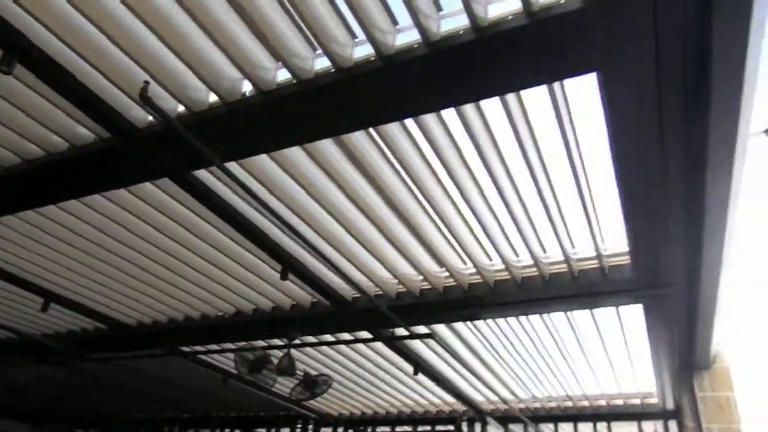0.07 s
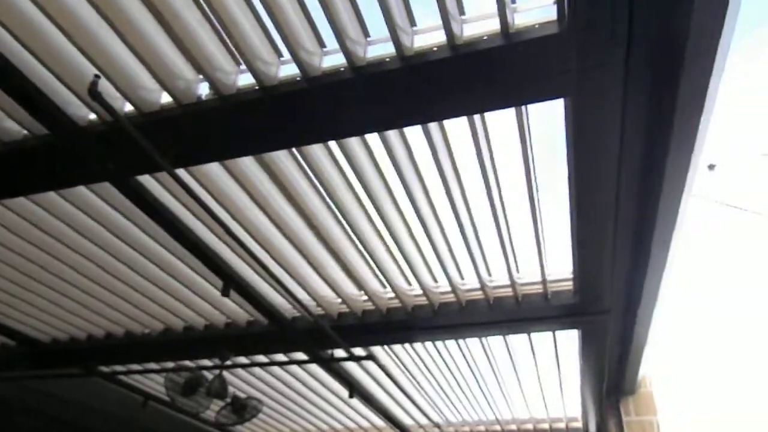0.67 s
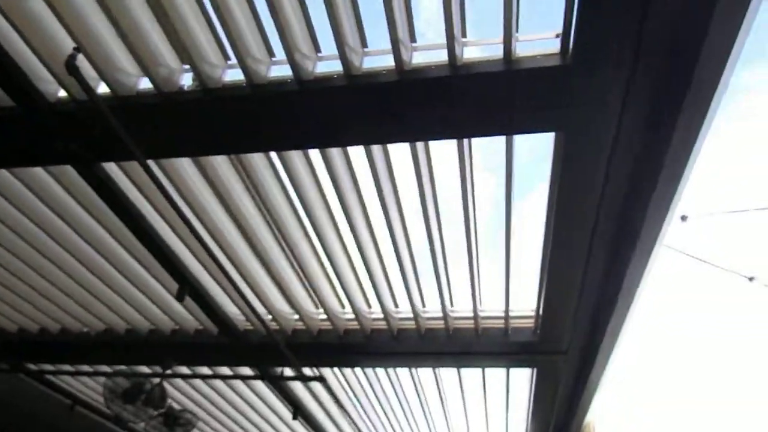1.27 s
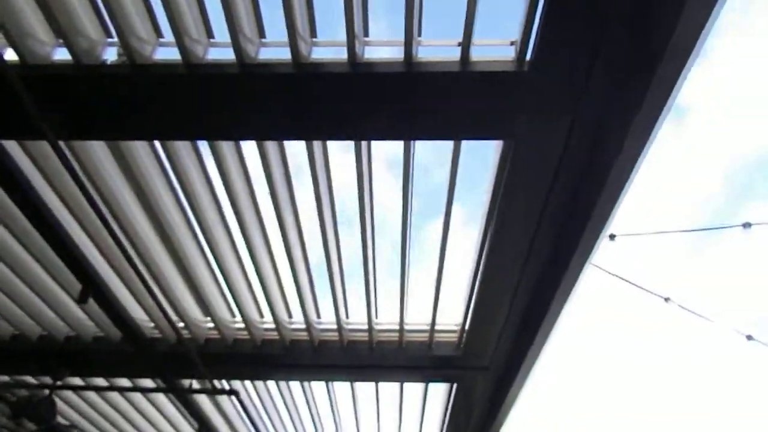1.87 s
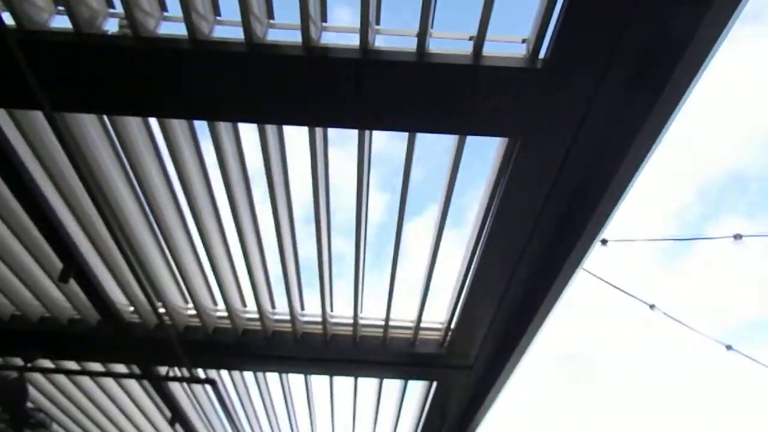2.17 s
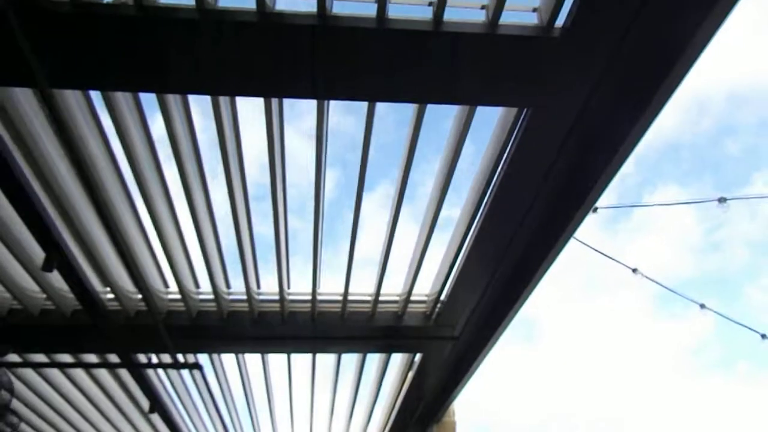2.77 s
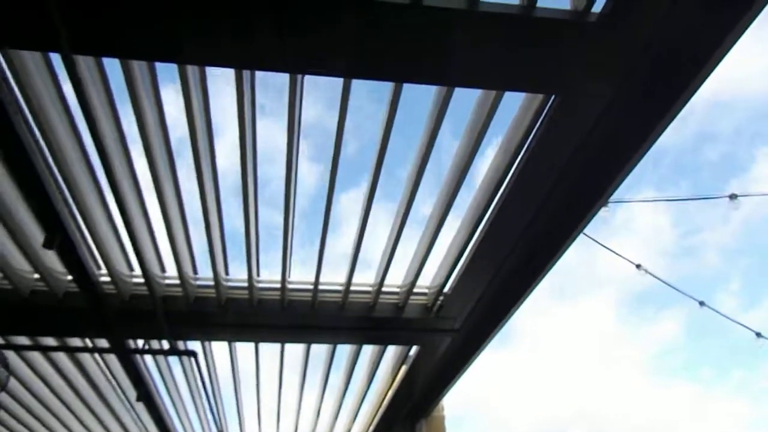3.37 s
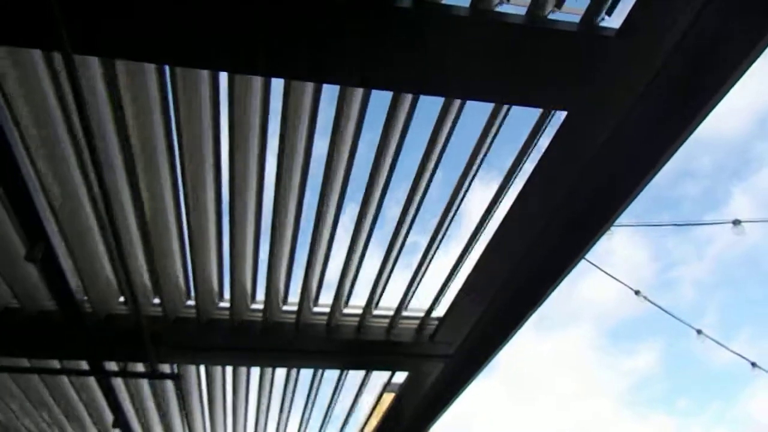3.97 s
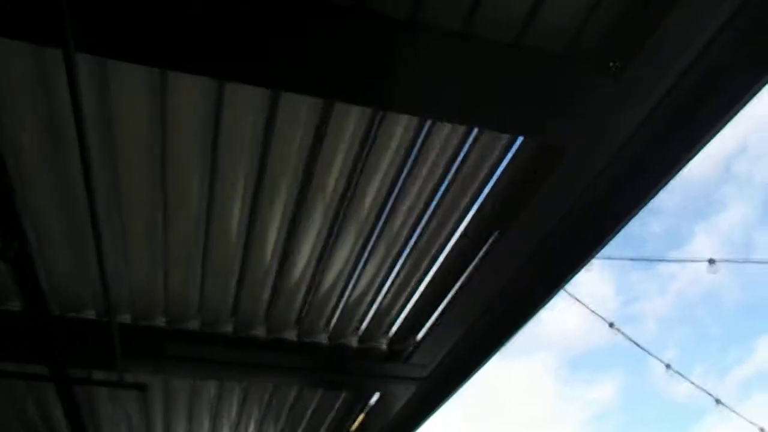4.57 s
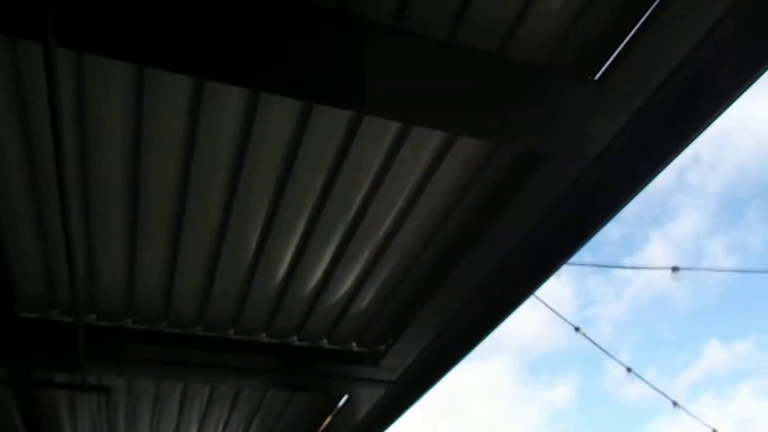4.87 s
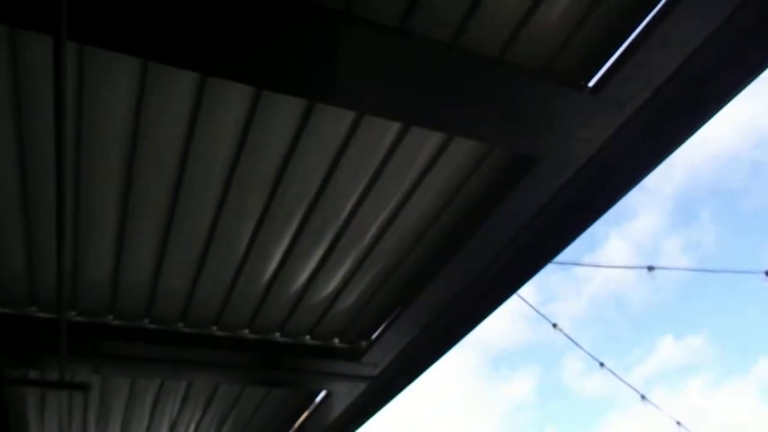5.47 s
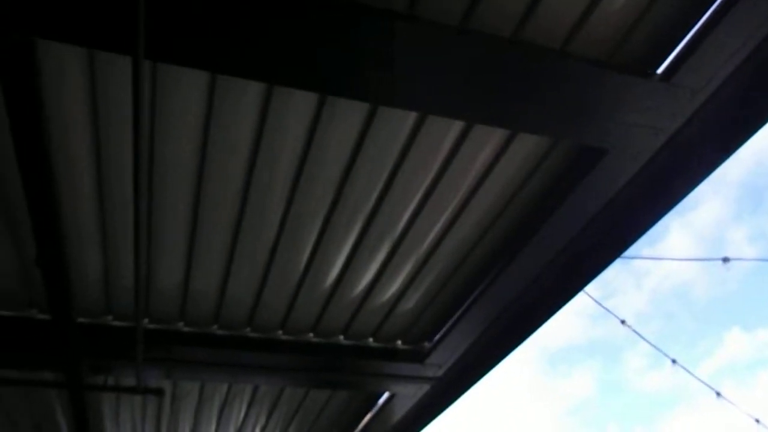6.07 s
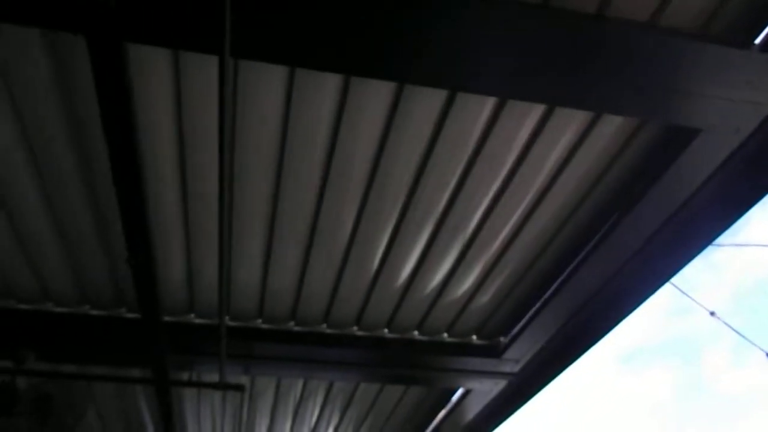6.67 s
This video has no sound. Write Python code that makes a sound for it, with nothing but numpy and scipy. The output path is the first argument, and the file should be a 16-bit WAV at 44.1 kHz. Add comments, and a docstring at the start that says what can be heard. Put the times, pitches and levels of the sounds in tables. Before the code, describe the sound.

Under a patio roof, metal louvers close in several loud, clattering volleys that ring briefly, mixed with high squeaks from dry pivots and sharp little clicks. Before this come a few close clicks and about three seconds of low, uneven wind puffs on the microphone. A faint hum and a wash of distant outdoor noise run throughout, with a soft swish after the slats settle.

```python
"""A motor shuts the hollow aluminium slats of a patio roof, over distant outdoor noise and a faint hum.
First a few small contacts click close by. For three seconds eddies of a light breeze buffet the
microphone, while one pivot chirps faintly with each turn of the drive. From 3.3 s to 5 s row after row
falls over: the impacts excite the modes of the slats and reverberate under the roof, amid squeaks of
dry pivots and more clicks. The ringing decays, and a soft swish passes in the outdoor noise."""
import sys
import numpy as np
from scipy import signal
from scipy.fft import rfft, irfft, next_fast_len
from scipy.io import wavfile
from scipy.ndimage import map_coordinates

SR = 44100
rng = np.random.default_rng(int(sys.argv[2]) if len(sys.argv) > 2 else 0)


def log_audio(samples):
    """Write samples as a 16-bit WAV file to the path given in sys.argv[1]."""
    # one column per channel
    frames = np.atleast_2d(samples).T
    # limit to full scale, then quantise
    limited = np.clip(frames, -1, 1)
    pcm = np.round(limited * 32767).astype(np.int16)
    wavfile.write(sys.argv[1], SR, pcm)


N = 296793

# Levels are relative within each table; t60 is the time of a 60 dB decay.
# spectrum of the distant noise: f/Hz, level/dB
AIR_SPECTRUM = [(25, -27), (70, -21.5), (130, -17.5), (220, -20), (340, -14), (450, -8.5), (800, -3),
                (1100, -2.5), (1350, -0.5), (1900, -9.5), (3500, -18.5), (5800, -16.5), (8000, -26),
                (10500, -37), (15800, -42.5)]
# its slow drift: t/s, level/dB
AIR_LEVEL = [(0, -44), (.8, -44.5), (2, -43.5), (3.2, -42.5), (5.3, -42), (6, -42), (6.7, -42)]
# soft swishes: t/s, half length/s, level/dB
SWISHES = [(2.015, 0.045, -42), (5.67, 0.12, -46.5)]
# their spectrum: f/Hz, level/dB
SWISH_SPECTRUM = [(1000, -50), (3000, 7.5), (6000, 11), (9000, -2), (15000, -30)]
# gusts at the microphone: t/s, length/s, level/dB
GUSTS = [(0.312, 0.12, -47), (1.163, 0.096, -43.5), (1.32, 0.17, -47), (1.54, 0.082, -40),
         (1.637, .045, -35.5), (1.845, .29, -38.5), (2.191, .13, -41), (2.411, .17, -46.5),
         (2.663, .035, -37), (2.76, 0.44, -55.5)]
# spectrum of slow eddies: f/Hz, level/dB
RUMBLE_SPECTRUM = [(20, -33), (45, -11), (90, -1.5), (200, -1), (350, -3), (600, -18), (1500, -71)]
# spectrum of fast eddies: f/Hz, level/dB
FLUTTER_SPECTRUM = [(60, -22), (200, -1), (380, -2.5), (600, -5), (900, -17), (2000, -71)]
# the hardest eddies: t/s, level/dB
HARD_EDDIES = [(.128, -36), (.283, -30.5), (0.394, -24.5), (1.339, -26), (1.543, -20), (1.65, -13.5),
               (1.663, -12.5), (1.675, -17), (1.683, -6.5), (1.69, -13), (1.847, -21.5), (1.9, -19),
               (1.934, -17), (2.001, -18.5), (2.059, -16), (2.125, -21.5), (2.249, -19), (2.308, -20),
               (2.448, -22), (2.672, -18.5)]
# a harder eddy passes faster: level/dB, f/Hz
EDDY_PITCH = [(-38.5, 122), (-28, 264), (-18.5, 360), (-15, 480)]
# small sharp clicks: t/s, peak level/dB, extra treble/dB
CLICKS = [(0.056, -19.5, -1), (.062, -17, 1), (.155, -22.5, -2.5), (.223, -31, 6), (0.291, -22, -1.5),
          (0.315, -23.5, -4), (3.157, -28, 17), (4.29, -22.5, -3), (4.364, -20.5, 6), (4.371, -18.5, -2),
          (4.604, -23.5, -1), (5.202, -24.5, 7)]
# modes of a click: f/Hz, level/dB, t60/s
CLICK_MODES = [(480, -11, 0.077), (1310, 1, 0.051), (1640, -2.5, 0.037), (2276, -8, 0.037),
               (3160, -6, 0.028), (4130, -11.5, 0.017), (5950, -3, 0.015), (6570, -2.5, 0.017),
               (7460, -6, 0.014), (8950, -24, 0.0088)]
# rotation of the drive: t/s, period/s
DRIVE_PERIOD = [(1.4, .28), (2, .34)]
# pivot squeaks: t/s, length/s, f/Hz, level/dB
SQUEAKS = [(3.397, 0.1, 8360, -44), (3.507, .061, 8600, -38.5), (3.516, 0.089, 9500, -54),
           (3.775, 0.097, 8390, -53), (4.028, 0.051, 8400, -49), (4.06, .19, 9190, -49),
           (4.248, 0.11, 8400, -51), (4.28, .19, 9030, -51), (4.465, 0.076, 8880, -41.5)]
# reverberation under the roof: f/Hz, t60/s
ROOF_DECAY = [(200, 1), (600, 1), (1500, 0.7), (5000, 0.57), (12000, 0.55)]
# spectrum of a struck slat: f/Hz, level/dB
SLAT_SPECTRUM = [(60, -35), (120, -30.5), (180, -29), (260, -13), (360, -5.5), (600, -1), (1050, -3),
                 (1500, -6.5), (2500, -11), (4000, -15), (6100, -15), (8600, -29), (11500, -42.5),
                 (15500, -56)]
# its crowded modes: f/Hz, t60/s
SLAT_DECAY = [(300, 0.24), (1000, .2), (3000, 0.13), (7000, 0.11), (13000, 0.1)]
# its strongest modes: f/Hz, level/dB, t60/s
SLAT_MODES = [(337, -3.5, 0.84), (520, 3.5, 0.34), (618, 4.5, 0.26), (674, -2, 0.31), (809, -7, 0.82),
              (904, 0.5, 0.51), (1076, 0, 0.58), (1820, -8, .3), (2050, -8, 0.2), (2800, 14, 0.14),
              (2970, 7, 0.19), (3780, -9, .25)]
# volleys of slats hitting each other: t/s, level/dB, rise/s, length/s, extra bass/dB, extra treble/dB
VOLLEYS = [(3.317, -31.5, 0.0024, 0.0069, -16, -3.5), (3.343, -16, 0.025, 0.035, -4, -4.5),
           (3.399, -21.5, .003, 0.15, -2, -14), (3.539, -13.5, 0.0099, .078, -1, -3),
           (3.74, -33.5, 0.022, 0.18, 1.5, 1.5), (4.021, -24.5, 0, .012, -16.5, -2),
           (4.14, -30, 0.016, .11, 7, 6), (4.412, -29, 0, 0.0038, -8, -2),
           (4.434, -12, 0.011, 0.065, -3, -1.5), (4.697, -12.5, 0.015, 0.097, -3.5, 1),
           (4.877, -18, 0, 0.061, 2, -1)]

HUM_HZ, TOP_HZ = 133.3, 15830
GUST_RISE_DB_PER_S, GUST_FALL_DB_PER_S, LULL_DB = 450, 350, -61.5
EDDIES_PER_S, EDDY_OVER_GUST_DB, EDDY_SCATTER_DB = 40, 12, 3.5
FIRST_CHIRP_S, CHIRP_S, CHIRP_HZ = 0.55, 0.062, 8200
SWELL_DB_PER_S, SAG_DB_PER_S, RELEASE_DB_PER_LENGTH = 478, 58, 19


def amp(db):
    """Amplitude ratio of a level."""
    return 10 ** (np.asarray(db) / 20)


def unit_rms(x):
    """Normalisation to rms 1."""
    return x / np.sqrt(np.mean(x ** 2) + 1e-20)


def along(points, hz):
    """Interpolation of (f/Hz, value) points on a logarithmic frequency axis."""
    f, values = np.transpose(points)
    return np.interp(np.log(hz + 1), np.log(f), values)


def wobble(rate):
    """Smooth random modulation, with rate knots a second."""
    knots = rng.standard_normal(int(N * rate / SR) + 4)
    return map_coordinates(knots, [np.arange(N) * rate / SR])


def add(track, s, x):
    """Superposition: x joins the track at s seconds."""
    i = max(round(s * SR), 0)
    track[i:i + len(x)] += x[:N - i]


def coloured(x, spectrum):
    """Minimum-phase filtering: folding the cepstrum makes the (f/Hz, gain/dB) response causal."""
    size = 2 * next_fast_len(len(x) // 2 + 4096)
    gain = amp(along(spectrum, np.fft.rfftfreq(size, 1 / SR)))
    cepstrum = irfft(np.log(gain + 1e-6))
    cepstrum[1:size // 2] *= 2
    cepstrum[size // 2 + 1:] = 0
    return irfft(rfft(x, size) * np.exp(rfft(cepstrum)))[:len(x)]


def noise(spectrum):
    """Filtered Gaussian noise of rms 1."""
    return unit_rms(coloured(rng.standard_normal(N), spectrum))


def dense_ring(t60s):
    """Modal overlap: crowded modes merge into noise, each band decaying at its own rate; energy 1."""
    hz, t, bands = signal.stft(rng.standard_normal(SR), SR, nperseg=256)
    decay = amp(-60 * t / along(t60s, hz)[:, None])
    tail = signal.istft(bands * decay, SR, nperseg=256)[1][:SR]
    return tail / np.linalg.norm(tail)


def ring(modes, size, scatter_db):
    """Free vibration: damped sines, struck at new strengths each time; energy 1."""
    t = np.arange(size) / SR
    x = np.zeros(size)
    for hz, db, t60 in modes:
        envelope = amp(db + scatter_db * rng.normal() - 60 * t / t60)
        x += envelope * np.sin(2 * np.pi * (hz * t + rng.random()))
    return x / np.linalg.norm(x)


def outdoors():
    """Ambient noise: a far, drifting wash, a low wavering hum and two soft swishes superpose."""
    t = np.arange(N) / SR
    wash_db = np.interp(t, *np.transpose(AIR_LEVEL)) + 1.5 + 0.23 * wobble(7)
    wash = amp(wash_db) * noise(AIR_SPECTRUM)
    hum_db = -61 + 1.6 * wobble(8)
    hum = amp(hum_db) * np.sin(2 * np.pi * np.cumsum(HUM_HZ + 4 * wobble(13)) / SR)
    swell = sum(amp(db) * np.exp(-((t - s) / width) ** 2) for s, width, db in SWISHES)
    return wash + hum + swell * noise(SWISH_SPECTRUM)


def gust_level():
    """Envelope of the wind in dB: each gust rises out of the lull, holds and falls back."""
    t = np.arange(N) / SR
    level = np.full(N, LULL_DB)
    for s, length, db in GUSTS:
        before_db = GUST_RISE_DB_PER_S * np.maximum(s - t, 0)
        after_db = GUST_FALL_DB_PER_S * np.maximum(t - s - length, 0)
        level = np.maximum(level, db - before_db - after_db)
    return level


def lesser_eddies(gust_db, count=400):
    """Irregular shedding: eddies are as strong as the gust that carries them. Rows: t/s, level/dB."""
    late, force = rng.random(count), rng.standard_normal(count)
    times = (np.arange(count) + late) / EDDIES_PER_S
    levels = np.interp(times, np.arange(N) / SR, gust_db) + EDDY_OVER_GUST_DB + EDDY_SCATTER_DB * force
    return [(s, db) for s, db in zip(times, levels) if s < N / SR and gust_db[int(s * SR)] > LULL_DB]


def breeze():
    """Turbulent pressure at the microphone port: a lumpy rumble, and one-cycle pushes from eddies."""
    pushes, t = np.zeros(N), np.arange(-SR // 50, SR // 50) / SR
    gust_db = gust_level()
    rumble = unit_rms(noise(RUMBLE_SPECTRUM) * amp(4.2 * wobble(40)))
    rumble *= amp(-47 + 0.73 * (gust_db + 42.5))
    # a faster flow sheds faster eddies, so strong gusts are brighter
    flutter = unit_rms(noise(FLUTTER_SPECTRUM) * amp(8 * wobble(110)))
    flutter *= amp(-49.5 + 1.9 * (gust_db + 44))
    for s, db in HARD_EDDIES + lesser_eddies(gust_db):
        phase = np.pi * np.interp(db, *np.transpose(EDDY_PITCH)) * t
        skew = rng.uniform(-1, 1)
        pulse = (2 * phase ** 2 - 1 + skew * phase / 2) * np.exp(-phase ** 2)
        add(pushes, s + t[0], amp(db - 3) * pulse)
    return pushes + rumble + flutter


def clicks():
    """Impulsive excitation: a small hard contact gives a snap and a heavily damped ring."""
    out, t = np.zeros(N), np.arange(SR // 10) / SR
    for s, db, treble_db in CLICKS:
        snap = rng.standard_normal(len(t)) * np.exp(-t / 0.0056)
        click = ring(CLICK_MODES, len(t), scatter_db=0.5) + amp(-3) * snap / np.linalg.norm(snap)
        click = coloured(click, [(2500, -treble_db), (6000, 7), (8000, 0), (14000, treble_db / 2 - 17.5)])
        add(out, s, amp(db) * click / np.abs(click).max())
    return out


def chirps(count=8, relative_db=-64):
    """Periodic friction: one squeak per turn of the drive, which slows under load. Rows as in SQUEAKS."""
    s, rows = FIRST_CHIRP_S, []
    for _ in range(count):
        rows.append((s, CHIRP_S, CHIRP_HZ, relative_db))
        s += np.interp(s, *np.transpose(DRIVE_PERIOD))
    return rows


def pivots():
    """Friction: dry bearings sing in short, unsteady tones, smeared by the roof's reverberation."""
    direct = np.zeros(N)
    for s, length, hz, db in SQUEAKS + chirps():
        size = int(length * SR)
        pitch = hz * (1 + 0.0031 * wobble(48) + 0.011 * wobble(940))[:size]
        swell = signal.windows.tukey(size, 0.7) * amp(3 * wobble(79)[:size])
        squeak = swell * np.sin(2 * np.pi * np.cumsum(pitch) / SR)
        add(direct, s, amp(db - 4.5) * unit_rms(squeak))
    return direct + amp(-1.5) * signal.fftconvolve(direct, dense_ring(ROOF_DECAY))[:N]


def slat_blow():
    """Impulse response of a slat: the contact cracks, the modes ring and reverberation builds up."""
    t = np.arange(SR) / SR
    crack = rng.standard_normal(SR) * np.exp(-t / 0.00088)
    clang = amp(-17) * ring(SLAT_MODES, SR, scatter_db=1.5)
    direct = amp(-8.5) * crack / np.linalg.norm(crack) + dense_ring(SLAT_DECAY) + clang
    build_up = 1 - np.exp(-t / 0.018)
    return direct + amp(-3) * dense_ring(ROOF_DECAY) * build_up


def contacts(rise, length, per_second=230, scatter_db=1.8, count=80):
    """Impulse train of slats landing unevenly: the force swells, sags and dies away in stragglers."""
    late, force = rng.random(count), rng.standard_normal(count)
    s = (np.arange(count) + late - late[0]) / per_second
    swell_db = -SWELL_DB_PER_S * np.maximum(rise - s, 0)
    fall_db = SAG_DB_PER_S * s + RELEASE_DB_PER_LENGTH * np.maximum(s / length - 1, 0)
    return np.bincount((s * SR).astype(int), amp(swell_db - fall_db + scatter_db * force))


def volley(rise, length, bass_db, treble_db, slats=3):
    """Convolution: the contacts are shared among a few slats, each with its own impulse response."""
    hits = contacts(rise, length)
    struck = rng.integers(slats, size=SR)[:len(hits)]
    clatter = sum(signal.fftconvolve(hits * (struck == k), slat_blow())[:SR] for k in range(slats))
    clatter = unit_rms(coloured(clatter, SLAT_SPECTRUM))
    # flat blows wake the low modes, edge blows the high ones
    return coloured(clatter, [(600, bass_db), (1400, 0), (2500, 0), (6000, treble_db)])


def closing_slats():
    """Impact sound: the rows of slats fall shut in turn, in clattering volleys."""
    out = np.zeros(N)
    for s, db, rise, length, bass_db, treble_db in VOLLEYS:
        add(out, s, amp(db - 13) * volley(rise, length, bass_db, treble_db))
    return out


def scene():
    """Superposition: the pressures of all sources add in one channel."""
    return (closing_slats() + pivots() + clicks() + breeze() + outdoors())[None]


def record(dry):
    """Band limiting: an ideal low-pass filter passes nothing above TOP_HZ."""
    size = next_fast_len(N + SR // 2)
    passband = np.fft.rfftfreq(size, 1 / SR) < TOP_HZ
    return irfft(rfft(dry, size) * passband, size)[:, :N]


dry = scene()
out = record(dry)
log_audio(out)
```